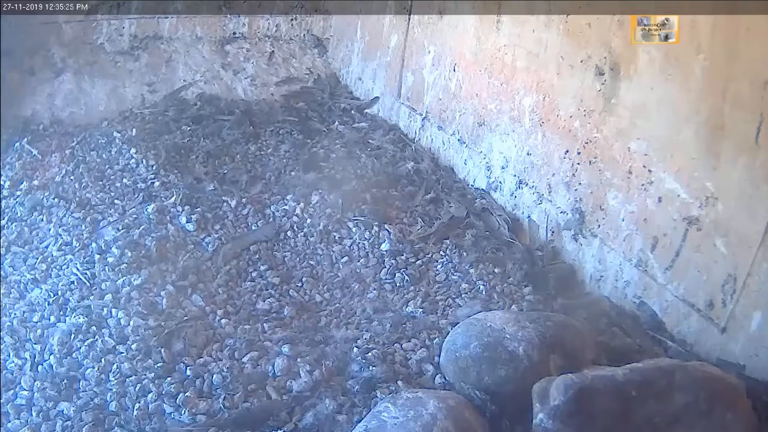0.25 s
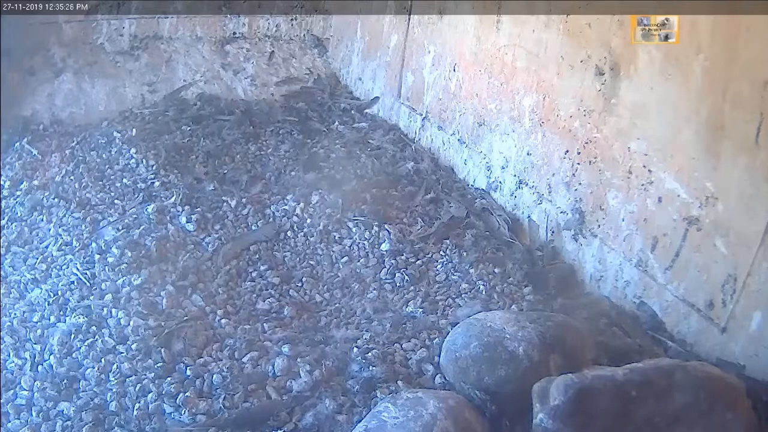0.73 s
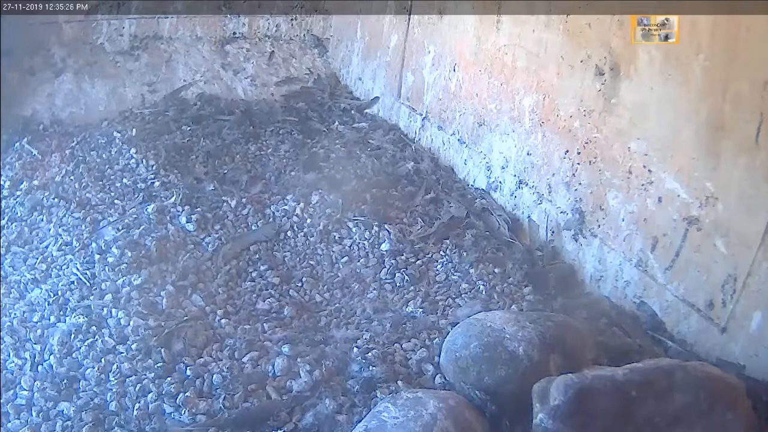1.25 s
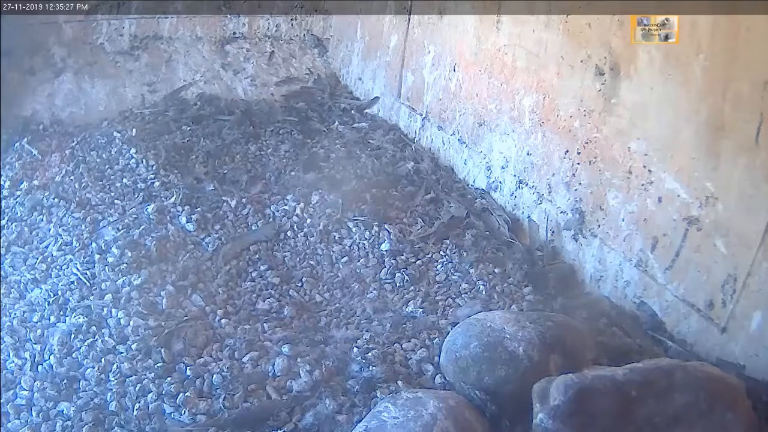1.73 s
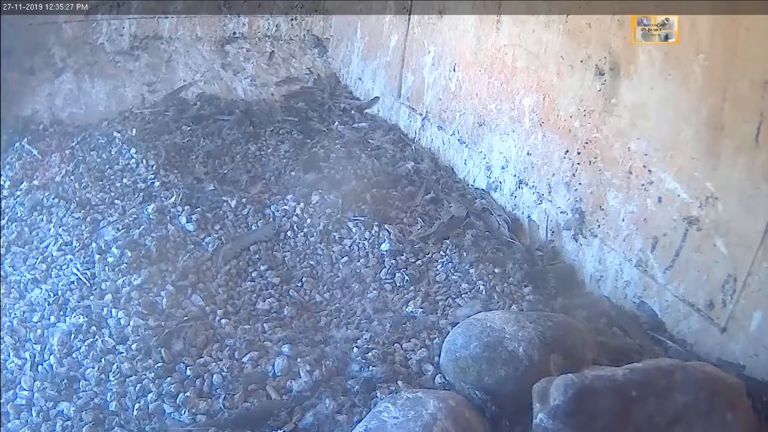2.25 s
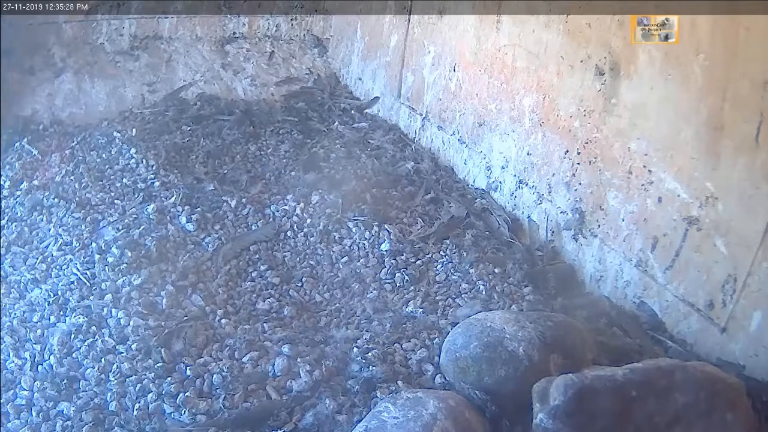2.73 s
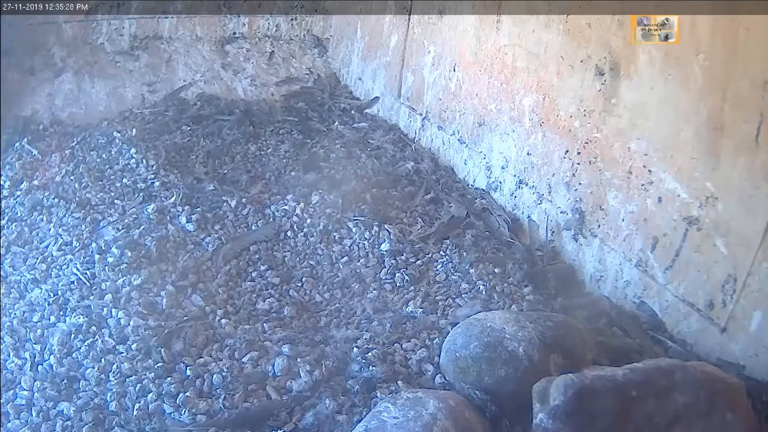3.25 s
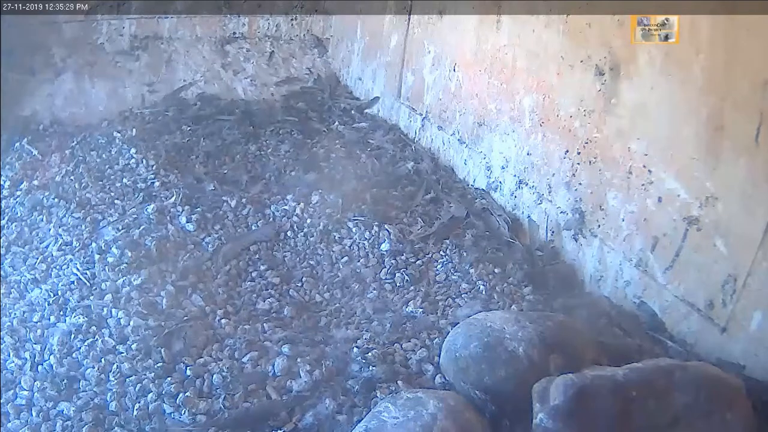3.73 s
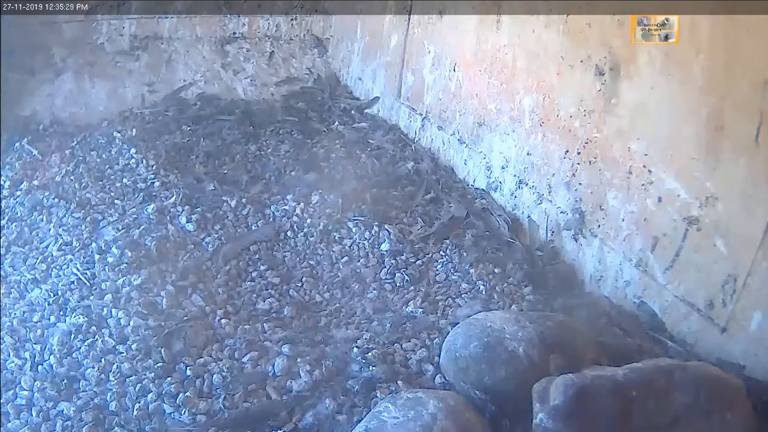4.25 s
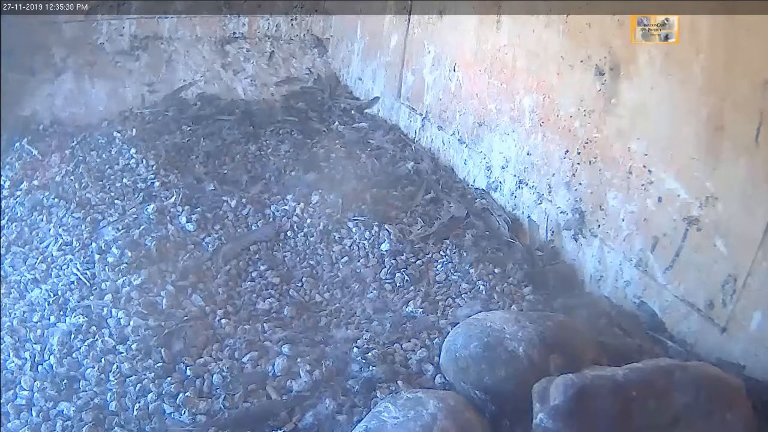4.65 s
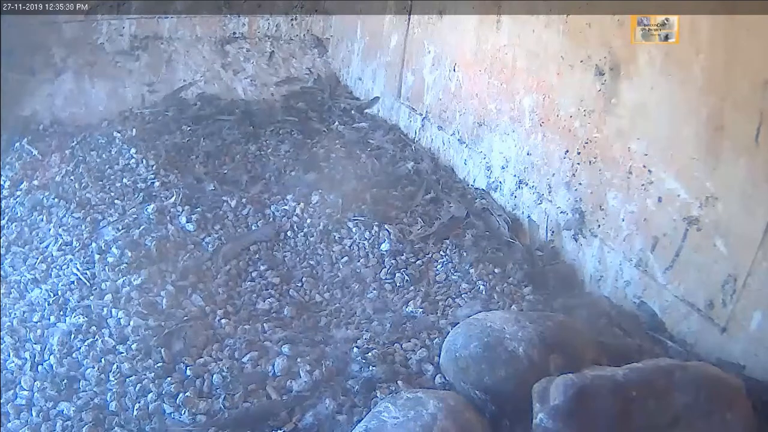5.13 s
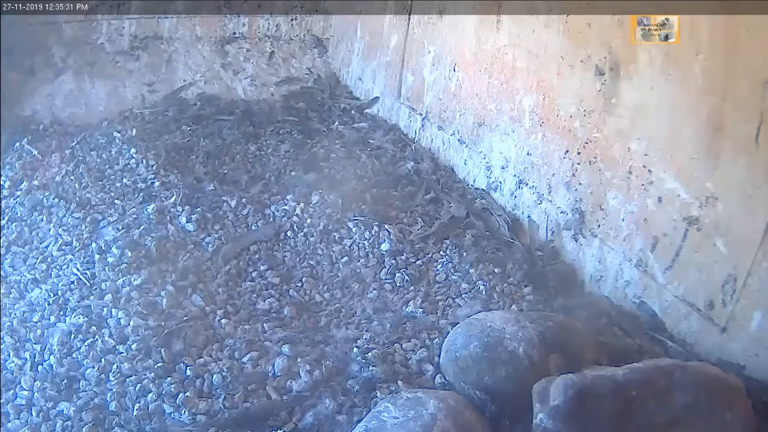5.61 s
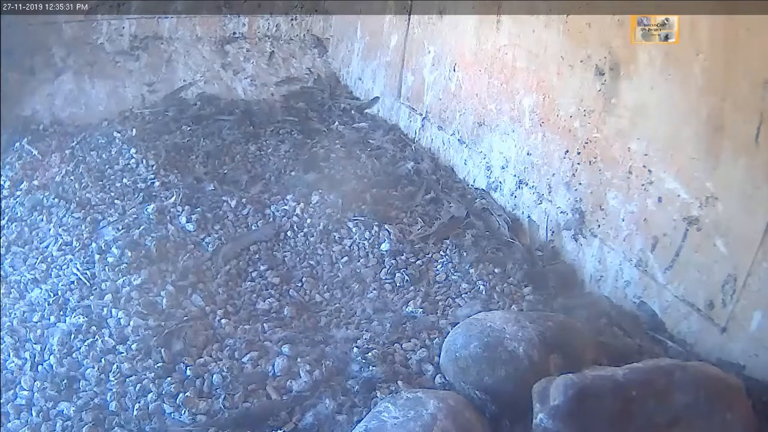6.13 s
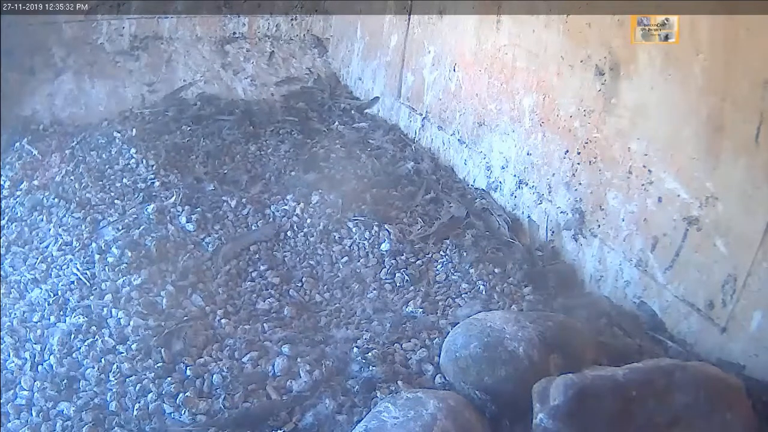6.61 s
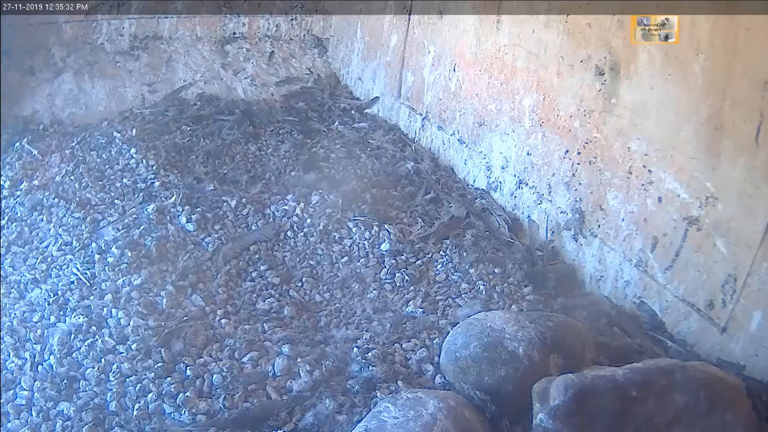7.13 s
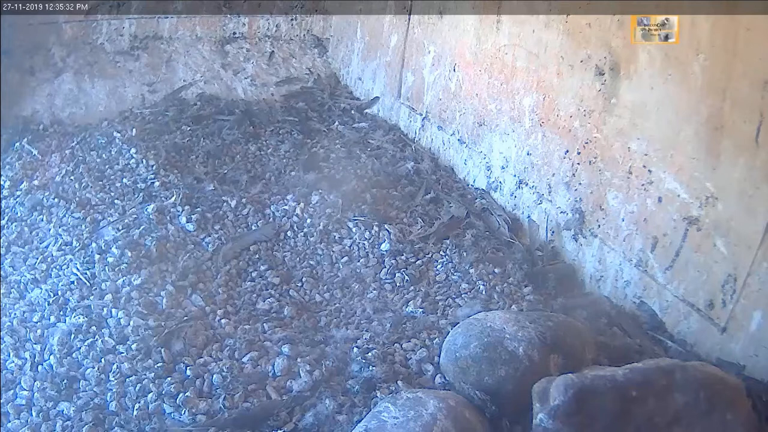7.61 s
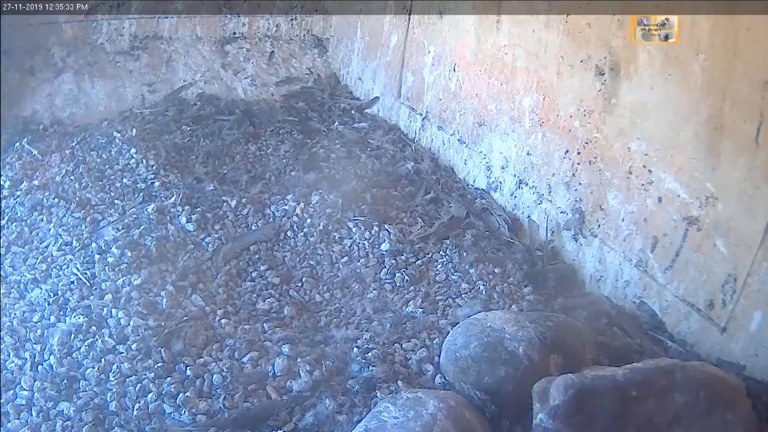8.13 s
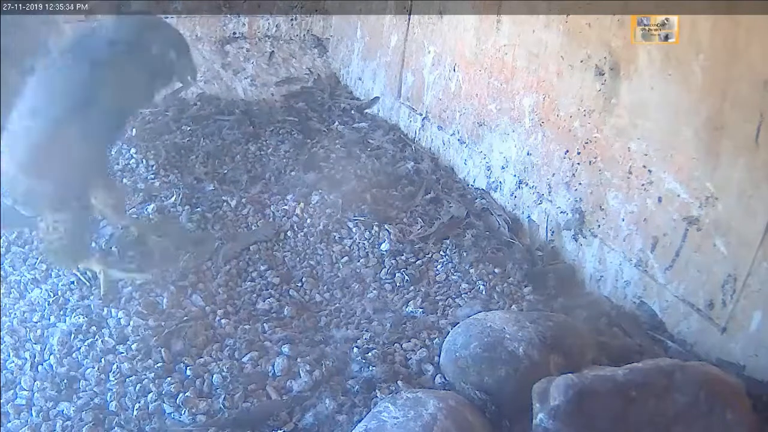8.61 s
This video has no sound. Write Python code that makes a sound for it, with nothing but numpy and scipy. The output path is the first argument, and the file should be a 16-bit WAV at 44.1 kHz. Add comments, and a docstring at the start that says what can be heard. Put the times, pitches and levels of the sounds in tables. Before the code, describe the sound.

Close to a small microphone in a nest box, a young falcon calls over and over in short, rasping honks with a hooting undertone. The quick calls vary a little in pitch and spacing, becoming stronger and more strained at the end. Behind them are a soft hum of outdoor air and a very faint high hiss. The sound drops out for instants and stops dead during the last call.

```python
"""In a nest box, close to a web camera's microphone: a young falcon honks harshly, four times a second,
louder and higher at the end. Each call is one arch of pitch and effort from the syrinx; it hoots where
its pitch meets the low air resonance, ends hoarse and rings briefly between the walls. Distant outside
air hums in the housing, and the camera adds a thin, high hiss of its own. The stream cuts out for
moments and stops dead in the last call."""
import sys
import numpy as np
from scipy import signal
from scipy.fft import rfft, irfft, next_fast_len
from scipy.io import wavfile
from scipy.ndimage import uniform_filter1d, map_coordinates

SR = 44100
rng = np.random.default_rng(int(sys.argv[2]) if len(sys.argv) > 2 else 0)


def master(y):
    """Save y as 16-bit WAV."""
    cut = np.clip(np.atleast_2d(y).T, -1, 1)
    pcm = np.round(cut * 32767)  # scale
    wavfile.write(sys.argv[1], SR, pcm.astype(np.int16))


N = 391166


def amp(db):
    """Decibels to gain."""
    return 10 ** (np.asarray(db) / 20)


def rms(x):
    """Root mean square."""
    return np.sqrt(np.mean(x ** 2) + 1e-20)


def unit(x):
    """x at rms 1."""
    return x / rms(x)


def along(points, hz):
    """Interpolate (frequency, value) points on a log frequency axis."""
    f, v = np.transpose(points)
    return np.interp(np.log(hz + 1), np.log(f + 1), v)


def wobble(rate, size):
    """A smooth random curve, rate knots a second."""
    return map_coordinates(rng.standard_normal(size // 8), [np.arange(size) * rate / SR], mode="wrap")


def filtered(x, response):
    """x times a complex response of frequency."""
    m = next_fast_len(len(x) + 8192)
    return irfft(rfft(x, m) * response(np.fft.rfftfreq(m, 1 / SR)), m)[:len(x)]


def noise(response):
    """Coloured noise at rms 1, as long as the scene."""
    return unit(filtered(rng.standard_normal(N), response))


def bell(f, hz, width):
    """A peak of height 1."""
    return 1 / (1 + ((f - hz) / width) ** 2)


def resonances(modes, f):
    """Causal response of a bank of resonances."""
    return sum(amp(db) * 1j * f * w / (c * c - f * f + 1j * f * w) for c, w, db in modes)


def steep(modes, f):
    """Resonances applied twice, for dark valleys between them."""
    return sum(amp(db) * resonances([(hz, width, 0)], f) ** 2 for hz, width, db in modes)


# Distant outdoor noise, heard from inside the box: (frequency [Hz], relative level [dB])
OUTDOOR_SPECTRUM = [(20, -5.5), (70, 2), (125, -4), (205, -6), (275, -11), (440, -8.5), (510, -22.5),
                    (760, -24), (1300, -24.5), (1650, -32), (2500, -20), (3400, -20), (4300, -35),
                    (4700, -38), (7000, -34.5), (7700, -56)]
# Resonances of the housing around the microphone: (frequency [Hz], width [Hz], relative level [dB])
HOUSING_MODES = [(301, 63.6, 0.5), (870, 120, -43), (1417, 180, -16), (1870, 260, -25), (2266, 230, -14.5)]


def outside_air():
    """Distant outdoor noise, part of it ringing in the camera housing."""
    wash = noise(lambda f: amp(along(OUTDOOR_SPECTRUM, f)))
    hum = noise(lambda f: steep(HOUSING_MODES, f))
    drift = amp(.8 * wobble(3, N))
    return (amp(-47) * wash + amp(-43.5) * hum) * drift


def camera_hiss():
    """A thin, high band of hiss from the camera itself."""
    return amp(-62) * noise(lambda f: steep([(7290, 90, 0)], f))


REST_HZ, STRAIN_HZ = 200.8, 268  # the syrinx starts to vibrate; the voice cracks into a screech


def breath(t, length, crest_s, crest_hz, db):
    """One arch of drive lifts pitch and effort together; louder calls swell more."""
    attack_s, release_s, softest_db = .001, .028, -42.5
    stage = np.interp(t, [0, crest_s, length], [-1, 0, 1])
    arch = np.abs(np.cos(np.pi / 2 * stage))
    lift = arch ** 1.3
    pitch = REST_HZ + (crest_hz - REST_HZ) * lift
    sharpness = .43 + .0033 * (crest_hz - REST_HZ)  # broad in low calls, pointed in high ones
    swell = amp(.43 * (db - softest_db) * (arch ** sharpness - 1))
    attack = 1 - np.exp(-t / attack_s)
    release = np.clip((length - t) / release_s, 0, 1) ** 2.7
    return stage, lift, pitch, swell * attack * release


def syrinx(pitch, stage, effort):
    """Each closing is an uneven pulse with a puff of turbulence, rougher under strain and at the end."""
    size = len(pitch)
    strain = 1 / (1 + np.exp((STRAIN_HZ - pitch) / 15))
    rough = .2 + .3 * strain + .3 * np.clip(stage, 0, 1) ** 2
    jitter = .03 * rough * wobble(400, size) + .009 * wobble(70, size)
    phase = 2 * np.pi * np.cumsum(pitch * (1 + jitter)) / SR
    overtones = np.arange(2, 37)[:, None]
    pulses = unit(np.cos(overtones * phase).sum(0)) * amp(1.2 * wobble(280, size))
    puffs = unit(rng.standard_normal(size) * (1 + .25 * np.cos(phase)))
    # turbulence takes over towards the treble
    clean = filtered(pulses * np.sqrt(1 - rough), lambda f: 1 / np.sqrt(1 + (f / 5000) ** 2))
    hoarse = filtered(puffs * np.sqrt(rough), lambda f: 3 * f / (f + 3600))
    return phase, unit(clean + hoarse) * effort * amp(.7 * wobble(70, size))


def screech(source, pitch, effort, from_crest_s):
    """Harder blowing adds a bright band, most of all at a strained crest."""
    half_length_s = .0093
    crack = np.maximum(pitch - STRAIN_HZ, 0) * np.exp(-(from_crest_s / half_length_s) ** 2)
    band = filtered(source, lambda f: bell(f, hz=3230, width=1100) ** 2)
    return (.13 * effort + .013 * crack) * band


# Beak nearly shut, at the edges of a call: (frequency [Hz], gain [dB])
BEAK_SHUT = [(300, -6.5), (420, 0), (640, -20), (1050, -3), (1500, -5), (1850, -0.5), (2250, -6),
             (2620, -19), (3050, -3.5), (3700, -8.5), (4400, -10.5), (4950, -18), (5700, -15), (7400, -24)]
# Beak wide open, at the crest: (frequency [Hz], gain [dB])
BEAK_OPEN = [(300, -21.5), (780, -26.5), (1050, -4), (1400, 1.5), (1750, -17), (2050, -11.5), (2400, -5),
             (3200, -9.5), (3800, -9.5), (4500, -19), (5000, -20), (5800, -16.5), (6700, -17.5),
             (7400, -29)]


def beak(source, gape, crest_hz):
    """The opening beak shifts the colour; a high call is thinner at the bottom."""
    low_shelf = lambda f: .69 + f ** 6 / (f ** 6 + (4.1 * crest_hz) ** 6)
    shut = filtered(source * (1 - gape), lambda f: amp(along(BEAK_SHUT, f)))
    wide = filtered(source * gape, lambda f: amp(along(BEAK_OPEN, f)) * low_shelf(f))
    return shut + wide


def head_pose(f, treble_db, mid_db):
    """Gain for one pose of the head: a treble tilt, a mid resonance and the box's ring near 2.3 kHz."""
    treble = treble_db * np.clip((f - 2500) / 2500, 0, 1)
    mid = mid_db * bell(f, hz=1470, width=280)
    box_ring = (1.75 + .61 * treble_db) * bell(f, hz=2340, width=220)
    return amp(treble + mid + box_ring)


# Box and housing, between bird and microphone: (frequency [Hz], width [Hz], gain [dB])
BOX_MODES = [(872, 50, 4), (1070, 60, -9), (1410, 100, -3), (1945, 70, -2), (2235, 70, -1), (2560, 50, -8),
             (2770, 40, -6), (2990, 130, -5), (3360, 80, -6), (3752, 30, -3), (4290, 120, -6),
             (4490, 45, -1), (5720, 160, -1), (6145, 40, 2), (6940, 25, 3)]
# Reflections off the close walls: (frequency [Hz], time to fall 60 dB [s])
WALL_DECAY = [(300, 0.064), (2000, 0.094), (7000, 0.04)]


def nest_box(voice, wet_db):
    """The box rings and adds a short wash of reflections, new for each pose of the bird's head."""
    direct = filtered(voice, lambda f: 1 + resonances(BOX_MODES, f))
    hz, t, spectrum = signal.stft(rng.standard_normal(SR // 8), SR, nperseg=256)
    decay = amp(-60 * t / along(WALL_DECAY, hz)[:, None])
    tail = signal.istft(spectrum * decay, SR, nperseg=256)[1]
    reflections = signal.fftconvolve(direct, tail / np.linalg.norm(tail))[:len(direct)]
    return direct + amp(wet_db) * reflections


# Low air resonances, heard from inside the box: (frequency [Hz], width [Hz], gain [dB])
CAVITY_MODES = [(294.5, 46.7, -2.5), (443, 60, -24)]


def hoot(phase, effort):
    """The fundamental needs full effort, and blooms as it glides through the low air resonance."""
    waver = amp(4.5 * wobble(70, len(phase)))
    fundamental = np.sin(phase) * effort ** 1.87 * waver
    return filtered(fundamental, lambda f: steep(CAVITY_MODES, f))


def call(length, crest_hz, db, treble_db, mid_db):
    """One honk at close range: a rasp of unsteady syrinx pulses over a round fundamental."""
    t = np.arange(SR // 3) / SR
    crest_s = length - .065
    stage, lift, pitch, effort = breath(t, length, crest_s, crest_hz, db)
    phase, source = syrinx(pitch, stage, effort)
    source = source + screech(source, pitch, effort, t - crest_s)
    voice = beak(source, gape=lift ** 3, crest_hz=crest_hz)
    voice = filtered(voice, lambda f: head_pose(f, treble_db, mid_db))
    low_cut_hz = 2.17 * crest_hz
    voice = filtered(voice, lambda f: f ** 4 / (f ** 4 + low_cut_hz ** 4))
    rasp = unit(nest_box(voice, wet_db=4)) * rms(effort)
    return amp(db) * (amp(-.49) * rasp + amp(6.5) * hoot(phase, effort))


# The falcon's calls, close to the microphone: (time [s], length [s], crest pitch [Hz],
# relative crest level [dB], treble [dB], mid resonance [dB])
FALCON_CALLS = [(0.043, 0.15, 267.7, -24, 0.5, -1.5), (0.293, .14, 296.5, -20, -8, -1.5),
                (0.527, 0.14, 288.4, -21, 1, 0.5), (.755, 0.14, 284.7, -20.5, 2, 4),
                (0.996, 0.14, 286, -18.5, 0, 1.5), (1.252, 0.15, 286.7, -19.5, 2, 1),
                (1.585, 0.14, 253.3, -22, 1.5, -3), (1.828, 0.2, 257, -21.5, 1.5, 3),
                (2.125, 0.15, 276.2, -21.5, -1.5, -0.5), (2.38, 0.15, 288.8, -21.5, -1.5, -1.5),
                (2.655, .159, 279, -24, 0.5, -8.5), (2.941, 0.15, 270.1, -23.5, -1, -7.5),
                (3.213, .16, 278.5, -22, 1, 1.5), (3.467, 0.15, 299.4, -21.5, 1.5, 3),
                (3.697, 0.13, 302.8, -20, -2.5, -2), (3.923, 0.14, 305.5, -20, -0.5, -7.5),
                (4.173, 0.14, 309, -20.5, -1, -3.5), (4.436, 0.15, 318, -20, -2, 1),
                (4.723, 0.17, 275.2, -22, -4, -4.5), (5.033, 0.16, 262.4, -22, -3, -2),
                (5.354, 0.14, 266.2, -20.5, -4.5, -3.5), (5.611, 0.15, 309.4, -19, -1.5, -1.5),
                (5.839, .141, 343.2, -19, -1.5, 1), (6.082, 0.14, 331.6, -21, -1.5, -4),
                (6.344, 0.15, 330.4, -21, -4.5, -8), (6.605, .15, 278, -21.5, 2.5, 1.5),
                (6.847, .146, 316, -19, 1.5, 0), (7.077, 0.15, 327, -16, 1, 5),
                (7.314, 0.14, 309.5, -17, 4.5, 3), (7.56, 0.15, 329.8, -16.5, 2, 8.5),
                (7.86, 0.14, 280.5, -16.5, 5, 2.5), (8.127, 0.15, 393, -11.5, 2, 6.5),
                (8.34, .138, 388.1, -9.5, 1.5, 2.5), (8.525, 0.14, 387.7, -10, -1.5, -0.5)]


def falcon():
    """The young bird honks in series, each call with its own pitch, effort and pose of the head."""
    out = np.zeros(N + SR)
    for start, *shape in FALCON_CALLS:
        sound = call(*shape)
        out[round(start * SR):][:len(sound)] += sound
    return out[:N]


def scene():
    """At the microphone: the bird close by, distant outside air and the camera's own hiss."""
    return (falcon() + outside_air() + camera_hiss())[None]


# Gaps in the microphone's stream: (start [s], end [s])
STREAM_GAPS = [(.699, .731), (.956, .979), (1.852, 1.883), (2.763, 2.778), (3.958, 3.993), (4.748, 4.763),
               (6.283, 6.299), (6.924, 6.939), (7.819, 7.835), (8.603, 8.9)]


def record(dry):
    """The camera's microphone: mono, clipping, narrow in band; dropouts leave a faint low noise."""
    roll_off_hz, top_hz = 7200, 7752
    t = np.arange(N) / SR
    live = np.ones(N)
    for start, end in STREAM_GAPS:
        live[(t > start) & (t < end)] = 0
    gate = uniform_filter1d(live, size=24)
    idle = amp(-71.5) * noise(lambda f: 1 / (1 + f / 60))
    sound = np.clip(dry[0] * gate + idle, -.85, .85)
    return filtered(sound, lambda f: (f < top_hz) / np.sqrt(1 + (f / roll_off_hz) ** 60))[None]


dry = scene()
out = record(dry)
master(out)
```